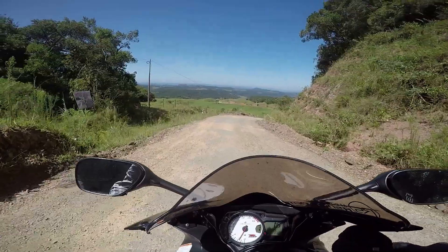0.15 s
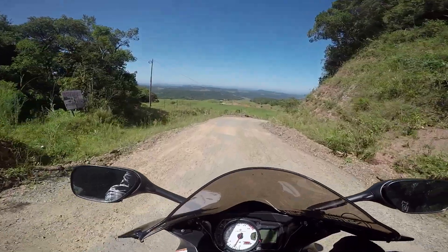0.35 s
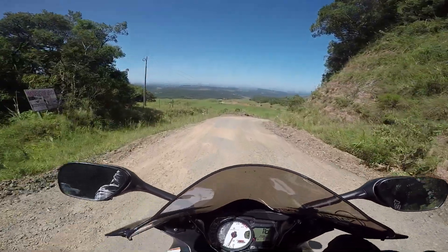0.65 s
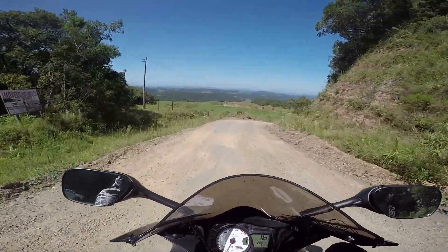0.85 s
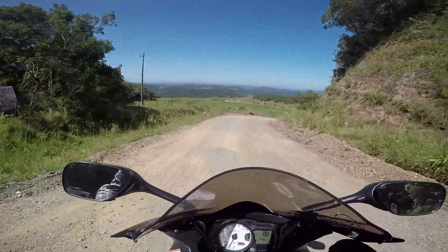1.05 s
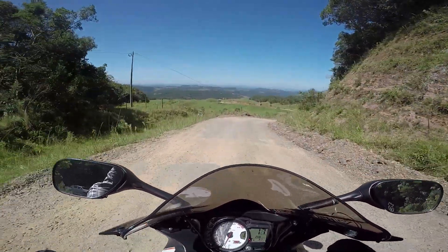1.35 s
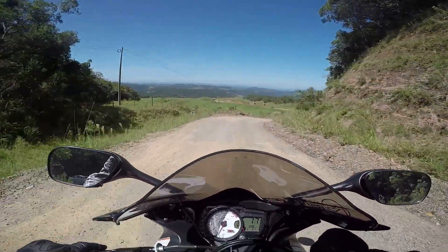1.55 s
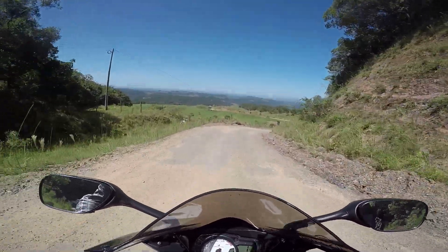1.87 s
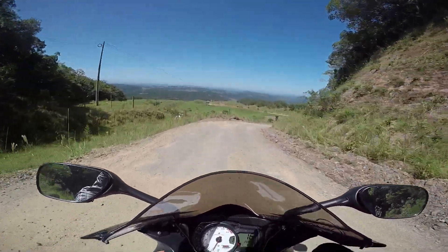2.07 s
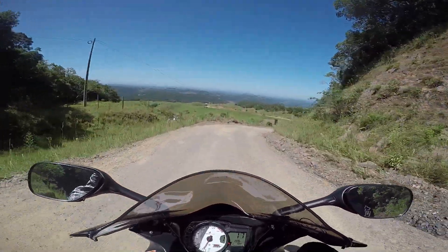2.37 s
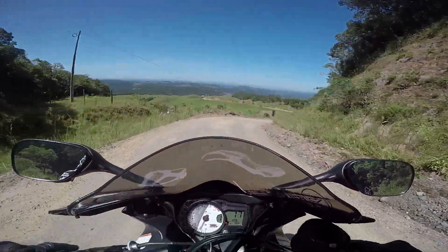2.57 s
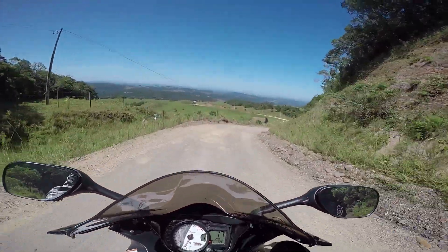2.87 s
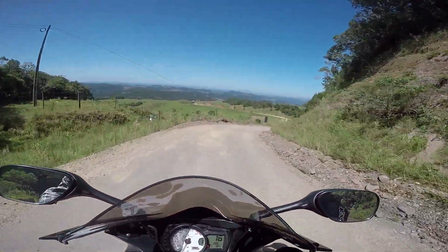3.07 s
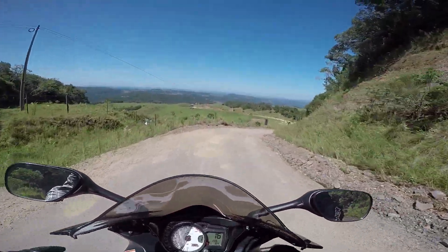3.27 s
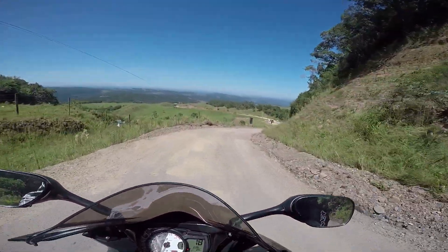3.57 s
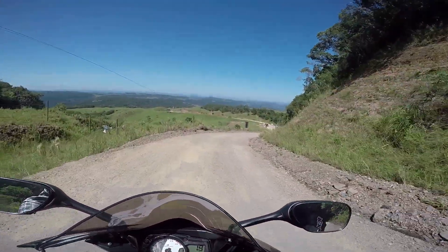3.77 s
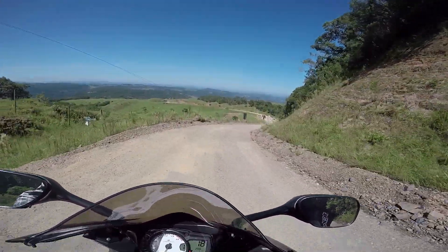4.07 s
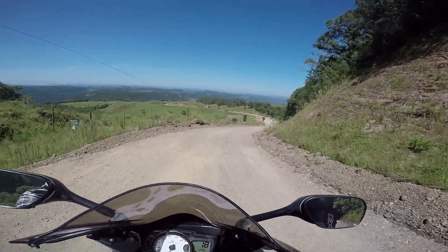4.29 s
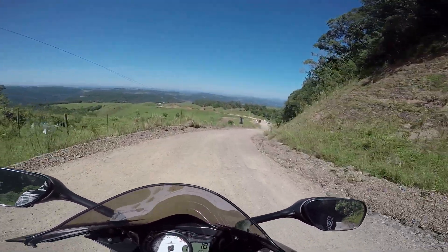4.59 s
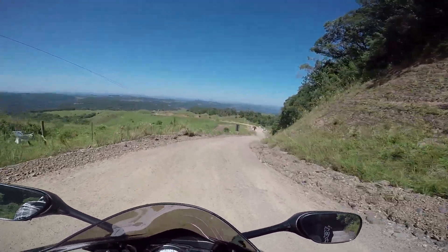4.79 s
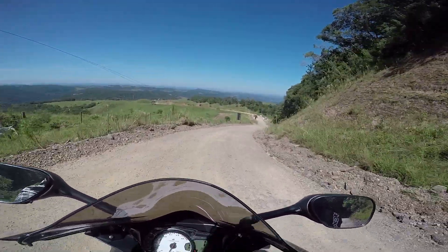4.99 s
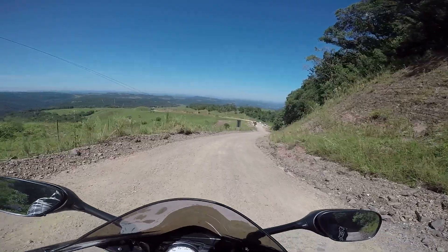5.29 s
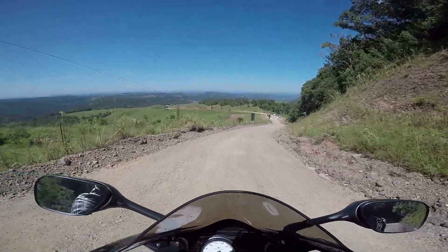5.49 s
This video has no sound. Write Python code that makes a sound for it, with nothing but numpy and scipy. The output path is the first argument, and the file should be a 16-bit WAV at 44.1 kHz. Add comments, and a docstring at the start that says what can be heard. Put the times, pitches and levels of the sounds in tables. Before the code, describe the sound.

A motorcycle rolls slowly down a gravel road, heard from a helmet camera in a closed housing. A deep, fluttering near-idle engine throb dominates, stumbling with frequent misfires. Behind it are muffled tyre rush, low rumble and thin whines. Stones clack on the fairing at the start and around half a second, sparsely through the middle, then more often from about four and a half seconds, ending in a rattling cluster.

```python
"""A gravel road: a four-cylinder motorcycle rolls near idle, heard close by a helmet camera in a closed housing.
Each firing is an impulse that booms in the silencer and a blunt dip in pressure; a weak cylinder often misses.
Tyres and gear train rush as shaped noise over low road rumble; a pump and the gear mesh whine as tones.
Stones ring the fairing as decaying modes, grit ticks on the housing, and loose gravel sprays swell the rush."""
import sys
import numpy as np
from scipy import signal
from scipy.fft import rfft, irfft, next_fast_len
from scipy.io import wavfile
from scipy.ndimage import uniform_filter1d

SR = 44100
rng = np.random.default_rng(int(sys.argv[2]) if len(sys.argv) > 2 else 0)


def wrap_up_sound(samples):
    """Save the sound to the file named by the first command line argument, as 16-bit audio."""
    columns = np.atleast_2d(samples).T
    # keep every value between -1 and 1, then stretch to whole-number steps
    tamed = np.clip(columns, -1, 1)
    steps = np.round(tamed * 32767).astype(np.int16)
    wavfile.write(sys.argv[1], SR, steps)


N = 248724
T = np.arange(N) / SR

# Low road noise through the frame: (centre [Hz], width [Hz], level at the usual idle before the bumps [dB])
RUMBLE_BANDS = [(9, 22, -52), (42, 11, -51.5), (80, 36, -38), (155, 60, -51), (238, 80, -42.5)]
# Rush of tyres on gravel and gear train through the housing, before swells and trim:
# (frequency [Hz], level [dB per Hz])
RUSH_SPECTRUM = [(450, -68.5), (600, -69), (740, -79.5), (1130, -80.5), (1330, -78.5), (1500, -83),
                 (1900, -83.5), (2200, -86.5), (2700, -82), (3700, -80), (4200, -87.5), (5100, -100),
                 (6500, -108), (7600, -110), (9000, -115), (11500, -115), (14000, -108), (15100, -112)]
# Panels that ring along with the rush: (centre [Hz], width [Hz], level before flicker [dB])
PANEL_BANDS = [(1300, 160, -62), (3240, 190, -62), (7370, 150, -88.5), (8800, 80, -100)]
# Sprays of loose gravel, lifts before graininess: (time of peak [s], crunch [dB], treble [dB], topmost fizz [dB])
GRAVEL_SPRAYS = [(.12, 3.5, 3, 2), (.47, 3.5, 2, 1), (2.7, 0, 1, 0), (2.775, 2, 8, 0), (2.87, 2, 2, 0),
                 (3.772, 3, 0, 0), (4.1, 0, 1, 3), (4.781, 2.5, 3, 0), (4.858, 2.5, 8, 1), (5.12, 0, 2, 3),
                 (5.395, 2, 2.5, 2), (5.425, 4.5, 5, 6)]
# Pump whine, which drops out for a while: (time [s], level before flutter [dB])
PUMP_LEVEL = [(0, -63), (.2, -55), (2.5, -56), (3.3, -58), (3.8, -71.5), (5.3, -80.5), (5.5, -57),
              (5.64, -58)]
# Gear mesh, which climbs and then sinks a little: (time [s], pitch [Hz], level before flutter [dB])
GEAR_MESH = [(0, 2524, -59), (2.2, 2540, -61), (2.6, 2585, -57), (3.0, 2700, -60), (3.4, 2715, -56),
             (3.8, 2750, -54), (4.1, 2750, -53.5), (4.4, 2720, -55), (4.75, 2740, -54.5), (5.1, 2710, -61),
             (5.64, 2700, -68)]
# Grit ticking on the housing: (time [s], impulse level before the ringing and its gain [dB])
GRIT_TICKS = [(.4714, -42), (0.4762, -33), (2.8395, -56), (4.727, -62), (4.78, -58), (4.845, -59),
              (5.087, -56)]
# Stones on the fairing: (time [s], peak level before the housing dulls it [dB], brightness [dB per mode])
STONE_KNOCKS = [(0.128, -37, 0), (0.1395, -24, -10), (0.159, -32, 0), (0.469, -30, -2), (0.478, -29, 0),
                (0.484, -33, 4), (1.448, -31, 4), (3.233, -34, 1), (3.349, -27.5, -2.5), (3.55, -35, -1),
                (4.4705, -22, -7), (4.727, -36, 14), (4.759, -37, -2), (4.774, -33, 4), (4.781, -29.5, 3.5),
                (4.83, -34, 2), (4.8395, -27, 0), (4.856, -34, 6), (4.887, -38, -11), (4.9828, -19, -2),
                (5.273, -28, -7), (5.384, -33, -5), (5.39, -29.5, 1), (5.403, -31, 3), (5.4105, -28, -1),
                (5.4165, -33, 0), (5.421, -31, 2), (5.432, -30, 2), (5.4485, -24, -11), (5.465, -29, -3),
                (5.473, -34, 3), (5.488, -35, -1), (5.498, -33, -7)]
# Modes of the fairing: (frequency [Hz], level [dB], longest 60 dB decay [s])
FAIRING_MODES = [(580, -13, .025), (680, -12, .02), (820, 0, .027), (1000, -4, .025), (1155, -4, .024),
                 (1350, -12, .025), (1780, -13, .018)]
# Firing rate, hunting up and down: (time [s], rate [firings per second])
FIRING_RATE = [(0.0, 61.5), (0.04, 64.2), (0.16, 58.8), (0.24, 61.0), (0.4, 55.5), (0.48, 56.8),
               (0.52, 54.8), (0.64, 57.0), (0.72, 56.1), (0.84, 61.1), (0.92, 55.2), (1.0, 59.1),
               (1.12, 57.6), (1.2, 59.9), (1.28, 58.8), (1.56, 62.0), (1.6, 60.1), (1.72, 61.4),
               (1.8, 58.3), (1.96, 55.2), (2.04, 60.6), (2.24, 62.3), (2.28, 60.7), (2.44, 60.0),
               (2.56, 60.9), (2.68, 61.4), (2.8, 58.7), (2.88, 59.4), (3.04, 55.7), (3.08, 56.4),
               (3.12, 62.5), (3.24, 62.1), (3.28, 65.4), (3.4, 61.1), (3.44, 64.6), (3.52, 63.7),
               (3.6, 65.6), (3.8, 66.9), (4.04, 62.8), (4.12, 66.3), (4.16, 61.8), (4.32, 63.6),
               (4.56, 62.7), (4.76, 60.2), (4.88, 61.0), (4.92, 59.5), (5.04, 62.3), (5.2, 59.2),
               (5.28, 59.7), (5.44, 57.8), (5.48, 61.5), (5.64, 56.6)]
# Sharp dip of each cylinder, the weak one first: (level [dB])
DIP_PATTERN = [-3, -1.5, -0.6, -1.5]
# Push into the silencer of each cylinder, the weak one first: (level [dB])
PUSH_PATTERN = [-.5, .3, -.5, 1]
# Gulp, a blunter dip, stronger once a crank turn: (level [dB])
GULP_PATTERN = [-6.5, -4]
# Misses and weak firings, mostly of the weak cylinder: (time [s], change in the dips [dB], change in the push [dB])
MISFIRES = [(0.044, -10.0, -8.0), (0.174, -4.0, -17.5), (0.308, -14.5, -14.0), (0.36, -1.0, -8.0),
            (0.52, -12.0, -14.5), (0.663, -13.0, -18.0), (0.716, -1.0, -11.5), (0.734, -4.0, -9.0),
            (0.869, -2.0, -8.5), (1.009, -14.0, -16.0), (1.281, -13.0, -16.0), (1.416, -12.5, -9.0),
            (1.547, -13.0, -2.0), (1.678, -7.5, 0.0), (2.088, -9.0, -5.5), (2.137, -4.5, -8.5),
            (2.154, -6.5, -5.0), (2.218, -10.5, -3.5), (2.283, -7.0, -6.0), (2.349, -8.0, 0.0),
            (2.614, -8.5, -11.0), (2.679, -10.5, -8.5), (2.728, -4.5, -10.0), (2.778, -6.0, -10.0),
            (2.812, -9.0, -4.5), (3.001, -1.0, -8.0), (3.019, -4.0, -12.0), (3.219, -5.0, -18.0),
            (3.472, -9.5, -2.5), (3.534, -7.0, -11.0), (3.596, -6.5, 0.0), (3.657, -10.5, -4.5),
            (3.717, -9.0, -6.0), (3.837, -7.5, -12.0), (3.945, -2.5, -12.0), (4.147, -4.0, -10.5),
            (4.196, -2.0, -11.0), (4.275, -6.0, -11.0), (4.449, -5.0, -11.0), (4.528, -7.5, -6.0),
            (4.592, -7.0, -4.0), (4.657, -6.5, 0.0), (4.789, -8.5, -9.5), (4.921, -10.0, -17.0),
            (5.052, -11.0, -7.0), (5.101, -5.5, -16.5), (5.183, -3.0, -16.5), (5.318, -9.5, -9.0),
            (5.455, -10.5, -4.5), (5.588, -8.0, -9.0)]
# Firings that bang: (time [s], lift [dB])
LOUD_FIRINGS = [(.19, 1), (.852, 4), (.886, 3), (3.765, 1.5), (3.898, 3), (4.09, 1), (4.417, 2.5)]
# Pipe resonance added to the dips: (centre [Hz], width [Hz], gain over the bare dip [dB])
PIPE_RESONANCE = [(200, 9.7, -8.5)]
# Header resonances: (centre [Hz], width [Hz], level relative to the header's [dB])
HEADER_RESONANCES = [(368, 26, -27), (398, 40, -18), (600, 120, -27), (500, 50, -31)]

# Road and gravel
RUMBLE_DB_PER_HZ = 1.45
CRUNCH_DB = 3  # standing lift of the crunch bands
SPRAY_RISE_S, SPRAY_FALL_S = 0.024, 0.056
GRAIN_HZ, GRAIN_SHARE = 260, .5  # the sprays crackle this often, by this share of their swell
# Pump, with a breathy band beside its tone
PUMP_HZ = 1962
BREATH_HZ, BREATH_WIDTH_HZ = 1905, 76.5
BREATH_DB, BREATH_REST_DB = -9, -64.5  # over the whine; what stays when the whine drops out
# Light stones at random moments
PEBBLES, PEBBLE_DB, PEBBLE_SPREAD_DB = 9, -42, 2.5
# Engine: places in firing intervals, widths at half height, resonances
DIP_AT, GULP_AT, PUSH_AT = .94, .56, 1.36
DIP_MS, GULP_MS = 1.85, 2.1
SILENCER_HZ, SILENCER_WIDTH_HZ = 70, 30
FRAME_HZ, FRAME_WIDTH_HZ = 222, 36
VALVES_ORDER = 10  # cycles per firing
# Engine levels at the usual idle, and their change per extra firing a second
IDLE_HZ = 60
BOOM_DB, BOOM_DB_PER_HZ = -24.5, -.3
DIPS_DB, DIPS_DB_PER_HZ = -27.5, -.45
JUDDER_DB, JUDDER_DB_PER_HZ = -38.5, 1.0
HEADER_DB, HEADER_DB_PER_HZ = -26, -0.1
VALVES_DB, VALVES_DB_PER_HZ = -48.5, -.9
# Scatter of the firings: even at idle, rougher once the engine pulls faster
SCATTER_DB, ROUGH_FROM_HZ, ROUGH_DB_PER_HZ = 1.1, 61.5, .45
WEAK_UNDER_DB = -6.2  # a change in the dips below this belongs to the weak cylinder
TOP_HZ = 15290  # the camera's upper limit


def undb(db):
    """Turn decibels into an amplitude factor."""
    return 10 ** (np.asarray(db) / 20)


def unit(x):
    """Scale to an RMS of 1."""
    return x / np.sqrt(np.mean(x ** 2))


def ring(x, hz, width):
    """Two-pole resonance, gain 1 at the centre."""
    return signal.lfilter(*signal.iirpeak(hz, hz / width, fs=SR), x)


def ring_twice(x, hz, width):
    """The same resonance passed twice, for steeper skirts."""
    return ring(ring(x, hz, width), hz, width)


def noise_band(hz, width):
    """White noise through a doubled resonance, at RMS 1."""
    return unit(ring_twice(rng.standard_normal(N), hz, width))


def clicks(s, size):
    """Impulses at times s, each shared between two samples."""
    out = np.zeros(N + 2)
    at = np.clip(np.asarray(s) * SR, 0, N)
    np.add.at(out, at.astype(int), size * (1 - at % 1))
    np.add.at(out, at.astype(int) + 1, size * (at % 1))
    return out[:N]


def blunt(x, ms):
    """Spread each impulse into a bell, ms wide at half height, centred on it."""
    t_ms = np.arange(-400, 401) / SR * 1000
    return signal.fftconvolve(x, .5 ** ((2 * t_ms / ms) ** 2), "same")


def walk(rate):
    """Random levels held 1 / rate s and slewed twice; spread near 1."""
    hold = int(SR / rate)
    steps = np.repeat(rng.standard_normal(N // hold + 1), hold)
    return 1.2 * uniform_filter1d(uniform_filter1d(steps, hold), hold)[:N]


def rumble(rate_hz):
    """Low road noise in bands that comes and goes with the bumps and grows when the engine pulls."""
    pull_hz = uniform_filter1d(rate_hz, size=SR // 4) - IDLE_HZ
    bumps_db = 1.6 * walk(9.4) + RUMBLE_DB_PER_HZ * pull_hz
    return undb(bumps_db) * sum(undb(db) * noise_band(hz, width) for hz, width, db in RUMBLE_BANDS)


def sprays():
    """Rise and fall in dB of the crunch, its treble and its fizz around each spray of gravel."""
    swell = [np.interp(T, [s - SPRAY_RISE_S, s, s + SPRAY_FALL_S], [0, 1, 0]) for s, *_ in GRAVEL_SPRAYS]
    smooth_db = np.transpose(GRAVEL_SPRAYS)[1:] @ np.array(swell)
    return smooth_db * (1 + GRAIN_SHARE * walk(GRAIN_HZ))


def rush(turns):
    """Half-octave noise bands flicker alone, swell with the gravel and throb a little with the firings."""
    hz_points, db_points = np.transpose(RUSH_SPECTRUM)
    crunch_db, treble_db, fizz_db = sprays()
    white = rfft(rng.standard_normal(next_fast_len(N)))
    f = np.arange(1, len(white) + 1) * SR / 2 / len(white)
    shape = undb(np.interp(np.log(f), np.log(hz_points), db_points))
    shape *= np.clip(f / hz_points[0], 0, 1) ** 2  # little of it below the lowest point
    out = np.zeros(N)
    for octave in np.arange(7, 14.5, .5):  # log2 of the band's centre in Hz
        window = np.clip(1 - 2 * np.abs(np.log2(f) - octave), 0, 1)
        band = irfft(white * shape * window)[:N]
        swell_db = (CRUNCH_DB + crunch_db) * (9 < octave < 11.2)
        swell_db = swell_db + treble_db * (12 < octave < 12.7) + fizz_db * (octave > 13.2)
        throb_db = 1.2 * np.cos(2 * np.pi * (turns - DIP_AT)) * (octave < 12)
        flicker_db = 0.46 * walk(10) + 1.3 * walk(35)
        out += band * undb(swell_db + throb_db + flicker_db)
    return out * np.sqrt(SR / 2) * undb(-0.48)  # dB per Hz to full band, and a trim


def panels():
    """Panels ring as noise bands, each with its own slow flicker."""
    return sum(undb(db + 2 * walk(5.5)) * noise_band(hz, width) for hz, width, db in PANEL_BANDS)


def gears():
    """The gear mesh is a sine that glides in pitch, blurred by fast random amplitude."""
    s, hz, db = np.transpose(GEAR_MESH)
    cycles = np.cumsum(np.interp(T, s, hz)) / SR
    return undb(np.interp(T, s, db)) * (0.71 + walk(190)) * np.sin(2 * np.pi * cycles)


def pump():
    """The pump's thin tone, nearly steady in pitch, with a breathy noise band beside it."""
    level_db = np.interp(T, *np.transpose(PUMP_LEVEL))
    cycles = np.cumsum(PUMP_HZ + 2.5 * walk(3.8)) / SR
    tone = np.sqrt(2) * undb(level_db + 0.86 * walk(15)) * np.sin(2 * np.pi * cycles)
    breath_level = undb(level_db + BREATH_DB) + undb(BREATH_REST_DB)
    return tone + breath_level * noise_band(BREATH_HZ, BREATH_WIDTH_HZ)


def ticks():
    """Each grain of grit is one impulse that rings briefly in two broad treble bands."""
    s, db = np.transpose(GRIT_TICKS)
    grains = clicks(s, undb(db))
    return 3 * ring_twice(grains, 5200, 2000) + 2.5 * ring_twice(grains, 13300, 4000)


def knocks():
    """Each stone rings the fairing's modes a little differently; a brighter one wakes the higher modes more."""
    out, t = np.zeros(N), np.arange(2600) / SR
    pebbles = [(rng.uniform() * T[-1], PEBBLE_DB + PEBBLE_SPREAD_DB * rng.standard_normal(), 0)
               for _ in range(PEBBLES)]
    for s, db, bright_db in STONE_KNOCKS + pebbles:
        lasting = np.clip(1 + (db + 20) / 25, .45, 1)  # lighter stones sound drier
        body = np.zeros(len(t))
        for m, (hz, mode_db, t60) in enumerate(FAIRING_MODES):
            level = undb(mode_db + m * bright_db + 0.78 * rng.standard_normal())
            detune = 1 + .025 * rng.standard_normal()
            body += level * np.sin(2 * np.pi * hz * detune * t) * 1000 ** (-t / t60 / lasting)
        body *= np.clip(t / .0012, 0, 1)  # the contact lasts about a millisecond
        i = int(s * SR)
        out[i:i + len(t)] += (undb(db) * body / np.abs(body).max())[:N - i]
    # the housing dulls them
    return signal.sosfilt(signal.butter(6, 3500, fs=SR, output="sos"), out)


def valve_gear(turns, fast_hz):
    """The valve gear hums as a sine locked to the firings, with a wandering level."""
    level_db = VALVES_DB + VALVES_DB_PER_HZ * fast_hz + 2.5 * walk(9)
    return undb(level_db) * np.sin(2 * np.pi * VALVES_ORDER * turns)


def firings(turns, rate_hz):
    """Plan every firing, its bangs and misses; uneven burning scatters size and timing of its impulses."""
    k = np.arange(-1, int(turns[-1]) + 1)
    fired = np.interp(k + DIP_AT, turns, T)
    scatter = SCATTER_DB + ROUGH_DB_PER_HZ * np.maximum(np.interp(fired, T, rate_hz) - ROUGH_FROM_HZ, 0)
    middle = np.interp(k + (DIP_AT + GULP_AT) / 2, turns, T)
    dips_db, push_db, cylinder = np.zeros(len(k)), np.zeros(len(k)), k.copy()
    for s, db in LOUD_FIRINGS:
        i = np.abs(middle - s).argmin()
        dips_db[i] = push_db[i] = db
    for s, dip_change_db, push_change_db in MISFIRES:
        i = np.abs(middle - s).argmin()
        dips_db[i], push_db[i] = dip_change_db, push_change_db
        if dip_change_db < WEAK_UNDER_DB:
            cylinder[i:] = k[i:] - k[i]  # the firing order counts on from the weak cylinder

    def train(place, pattern_db, share, jitter_ms, odd_db=dips_db):
        """One impulse per firing, at its place in the cycle; the jitter grows with scatter squared."""
        timing, size = np.sqrt(3) * rng.uniform(-1, 1, (2, len(k)))
        when = np.interp(k + place, turns, T, right=9) + scatter ** 2 * jitter_ms / 1000 * timing
        cylinder_db = np.take(pattern_db, cylinder, mode="wrap")
        return clicks(when, undb(cylinder_db + odd_db + share * scatter * size))

    return train, push_db


def silencer_boom(train, push_db):
    """Each push of exhaust rings the silencer."""
    return unit(ring_twice(train(PUSH_AT, PUSH_PATTERN, .6, .2, push_db), SILENCER_HZ, SILENCER_WIDTH_HZ))


def pressure_dips(train):
    """Each firing leaves a sharp dip and a blunter gulp, coloured by the pipe's resonance."""
    dip = blunt(train(DIP_AT, DIP_PATTERN, .8, .06), DIP_MS)
    gulp = blunt(train(GULP_AT, GULP_PATTERN, .8, .08), GULP_MS)
    dips = uniform_filter1d(dip + gulp, 1500) - dip - gulp  # suction around a resting pressure of zero
    return unit(dips + sum(undb(db) * ring(dips, hz, width) for hz, width, db in PIPE_RESONANCE))


def frame_judder(train):
    """The frame rings when it is shaken once a crank turn, every second firing."""
    return unit(ring_twice(train(GULP_AT, [-60, 0], .6, .05), FRAME_HZ, FRAME_WIDTH_HZ))


def header_ring(train):
    """The valve's snap at each firing rings the header's resonances."""
    snap = -train(DIP_AT, DIP_PATTERN, .5, .04)
    return sum(undb(db) * unit(ring_twice(snap, hz, width)) for hz, width, db in HEADER_RESONANCES)


def engine(turns, rate_hz):
    """Boom, dips, judder, header and valve gear share the firings; each level follows the firing rate."""
    train, push_db = firings(turns, rate_hz)
    fast_hz = rate_hz - IDLE_HZ
    out = valve_gear(turns, fast_hz)
    out += undb(BOOM_DB + BOOM_DB_PER_HZ * fast_hz) * silencer_boom(train, push_db)
    out += undb(DIPS_DB + DIPS_DB_PER_HZ * fast_hz) * pressure_dips(train)
    out += undb(JUDDER_DB + JUDDER_DB_PER_HZ * fast_hz) * frame_judder(train)
    out += undb(HEADER_DB + HEADER_DB_PER_HZ * fast_hz) * header_ring(train)
    return out


def scene():
    """Road and gravel behind, then the whines, grit and stones, and the engine in front."""
    rate_hz = np.interp(T, *np.transpose(FIRING_RATE))
    turns = np.cumsum(rate_hz) / SR  # firings counted
    road = rumble(rate_hz) + rush(turns) + panels()
    whines = gears() + pump()
    strikes = ticks() + knocks()
    return (road + whines + strikes + engine(turns, rate_hz))[None]


def record(dry):
    """The sound comes in over a few milliseconds; the camera cuts the top."""
    faded = dry * np.clip(T / .003, 0, 1)
    return signal.sosfilt(signal.ellip(10, .2, 70, TOP_HZ, fs=SR, output="sos"), faded)


dry = scene()
out = record(dry)
wrap_up_sound(out)
```